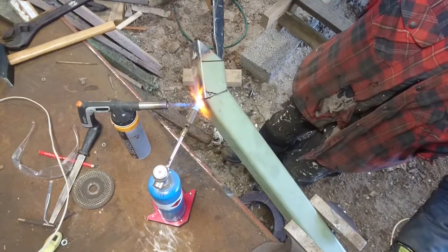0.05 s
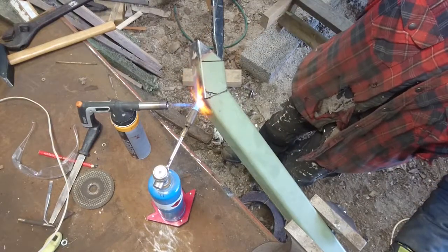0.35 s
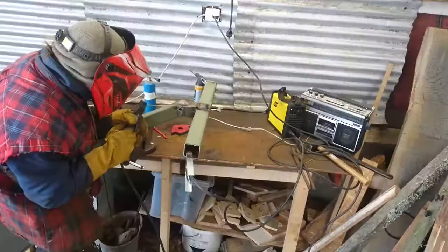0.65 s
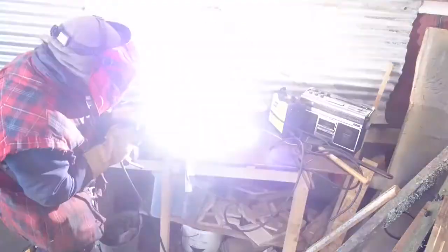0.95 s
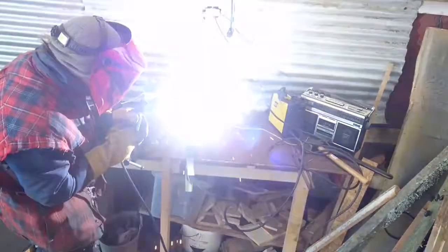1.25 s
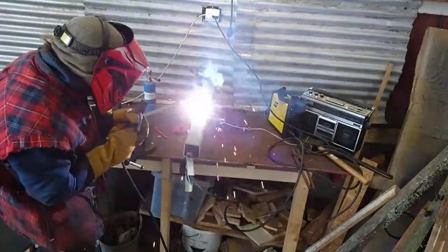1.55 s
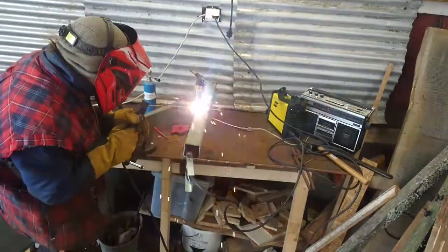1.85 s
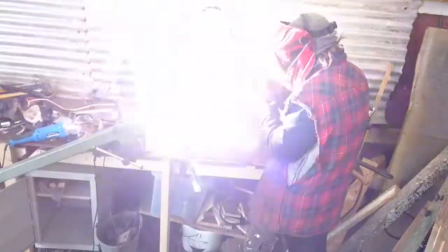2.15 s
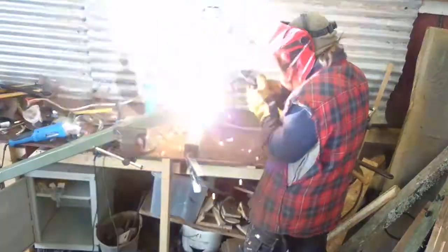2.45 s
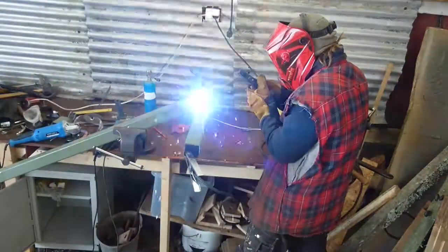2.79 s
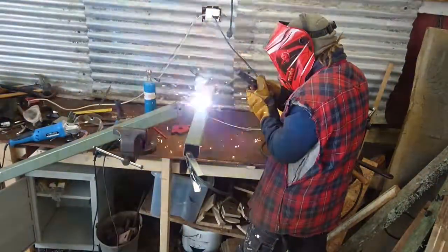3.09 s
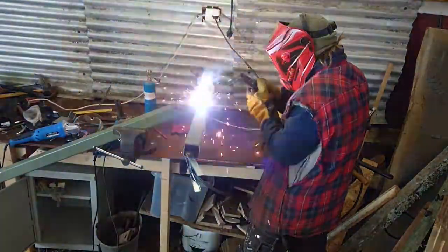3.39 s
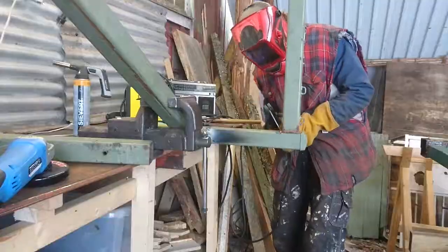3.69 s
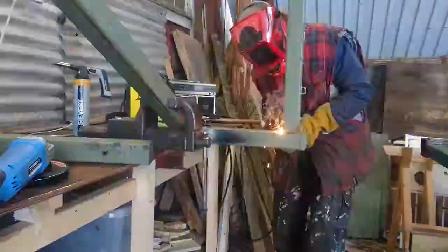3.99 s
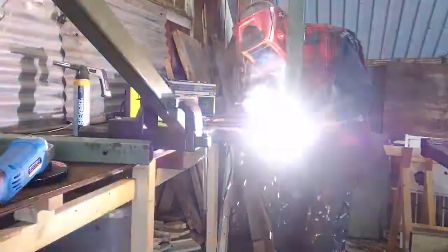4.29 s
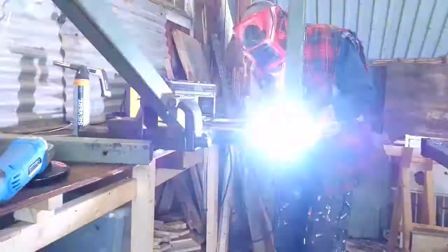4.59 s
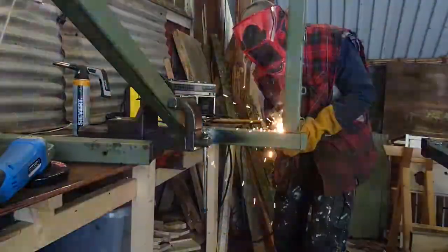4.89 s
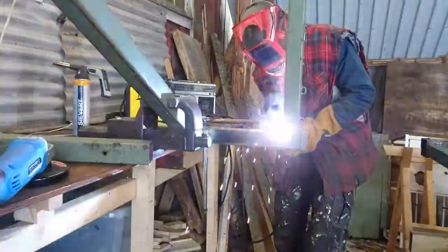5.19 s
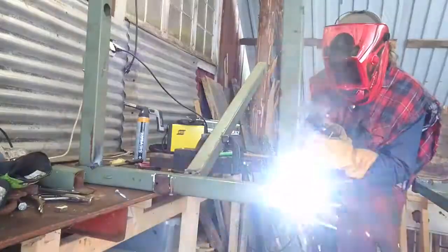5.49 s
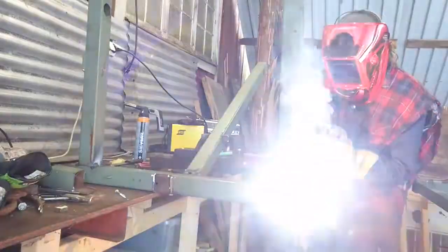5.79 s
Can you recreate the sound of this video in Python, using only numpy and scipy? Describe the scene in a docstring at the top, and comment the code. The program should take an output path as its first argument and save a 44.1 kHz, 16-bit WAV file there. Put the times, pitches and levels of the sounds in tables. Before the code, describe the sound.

A gas torch hisses and roars steadily against steel, close by, with a faint wavering whistle. After about half a second it cuts off abruptly, leaving a welding machine's faint whirring fan. An arc strikes with sharp snaps, then sizzles and sputters in several uneven runs, quieter than the torch, with brief pauses. It is heard from across a workbench, with quick echoes off the iron walls of a shed.

```python
"""Stick welding in a corrugated iron shed, cut in abruptly after a short blast of a gas torch.
The torch's jet roars, rings its burner tube and whistles against a steel tube. Then the arc burns in
several runs: tiny discharges sizzle, the molten pool sputters and bursting drops of metal spit.
It is heard from across the bench, then at the vice, with quick echoes off the iron walls,
while the welding machine's cooling fan whirs behind it."""
import sys
import numpy as np
from scipy import signal
from scipy.fft import rfft, irfft, next_fast_len
from scipy.io import wavfile
from scipy.ndimage import map_coordinates

SR = 44100
rng = np.random.default_rng(int(sys.argv[2]) if len(sys.argv) > 2 else 0)


def wav_out(sig):
    """Save sig, one row per channel (or a flat mono array), as 16-bit PCM at SR to the path in sys.argv[1]."""
    wavfile.write(sys.argv[1], SR, np.round(np.clip(np.atleast_2d(sig).T, -1, 1) * 32767).astype(np.int16))


N = 257522
TORCH_END_S, BENCH_STEP_S, VICE_S, VICE_STEP_S, END_S = .608, 2.03, 3.53, 5.42, 6  # listening places

# turns of the flame's whistling glide: time_s, pitch_hz, note_db, octave_db
WHISTLE_GLIDE = [(0.0, 849.6, -42.5, -53), (0.05, 757, -55.5, -38.5), (0.075, 580.4, -45, -40),
                 (0.1, 540.3, -63, -66), (0.125, 773.6, -60, -40), (0.148, 954, -40, -51),
                 (0.168, 886, -47, -54), (0.183, 953, -40.5, -53), (0.205, 746.0, -45, -35),
                 (0.222, 753, -43, -35.5), (0.24, 798.5, -48, -55), (0.265, 575.6, -62, -46),
                 (0.285, 559.7, -56, -50), (0.307, 604.5, -57, -41), (0.33, 648, -59, -52),
                 (0.35, 859, -45, -51), (0.378, 656.4, -43, -40), (0.398, 544.4, -64, -45),
                 (0.422, 536, -55, -44), (0.44, 582, -51, -47), (0.462, 768, -43, -38),
                 (0.482, 931, -45, -44), (0.5, 1090, -47, -54), (0.53, 995, -63, -59),
                 (0.552, 849, -51, -41), (0.568, 882.5, -31, -34), (0.587, 912, -57, -46),
                 (0.605, 937, -33.5, -35.5)]
# hollow ring of steelwork, bench and iron walls: pitch_hz, width_hz, lift_db
BENCH_RESONANCES = [(614, 75, 3), (822, 78, 6.5), (1122, 120, 7), (1365, 62, 3.5), (1473, 29, 10.5),
                    (1670, 68, 8.5), (2105, 60, 6.5), (2300, 50, 4.5), (2505, 64, 6.5), (2894, 67, 3.5),
                    (3220, 140, 3), (4540, 290, 3.5), (5320, 200, 5), (6200, 93, 5.5), (7020, 130, 4),
                    (7900, 110, 0), (9810, 71, 4), (11540, 130, 5), (12200, 200, 7), (13300, 160, 9.5),
                    (13900, 180, 4.5), (14850, 130, 3), (15220, 150, 4)]
# stereo balance across the bench and at the vice: freq_hz, left_over_right_db
BENCH_BALANCE = [(60, -20), (180, 3), (550, -3.5), (1650, -1), (4970, -0.5), (15000, -1)]
VICE_BALANCE = [(60, 2), (180, 1), (550, -3.5), (1650, -2), (4970, -2), (15000, -1.5)]
# drops of metal bursting in the arc: start_s, level_db
DROP_BURSTS = [(.9353, -39), (.9614, -39), (.9951, -31), (1.0309, -23), (1.043, -27), (1.068, -31),
               (1.121, -31), (1.134, -28), (1.1371, -25), (1.162, -32), (1.1929, -37), (1.1964, -36),
               (1.335, -37), (1.6421, -39), (1.7793, -54), (1.975, -41), (2.116, -37), (2.122, -31),
               (2.202, -40), (2.3857, -47), (2.404, -41), (2.437, -45), (2.4676, -43), (2.536, -31),
               (2.7414, -37.5), (2.9541, -38), (3.0975, -35), (3.1525, -38), (3.2172, -46), (3.311, -35),
               (3.5078, -33), (3.9494, -51), (3.967, -38), (3.9904, -43), (4.0448, -40), (4.0781, -45),
               (4.3079, -43), (4.3345, -46), (4.3578, -40), (4.4233, -44), (4.5419, -55), (4.6602, -36),
               (4.8262, -42), (4.9164, -36), (5.147, -32.5), (5.233, -35), (5.3158, -34.5), (5.3786, -38),
               (5.3945, -43), (5.435, -43), (5.452, -32), (5.5369, -43), (5.635, -47), (5.7173, -34)]


def amp(db):
    """Decibels to gain."""
    return 10 ** (np.asarray(db) / 20)


def unit(x):
    """Scale to rms 1."""
    return x / np.sqrt(np.mean(x ** 2) + 1e-20)


def along(points, hz):
    """Read (freq_hz, value) points on a log frequency axis."""
    freqs, values = np.transpose(points)
    return np.interp(np.log(hz + 1), np.log(freqs + 1), values)


def curves(rows):
    """One automation curve for each column after the time."""
    times, *columns = np.transpose(rows)
    return [np.interp(np.arange(N) / SR, times, column) for column in columns]


def during(start, end, fade_s=0.0017):
    """A gate with short ramps."""
    t = np.arange(N) / SR
    return np.clip(np.minimum(t - start, end - t) / fade_s + .5, 0, 1)


def swells(rows):
    """A sum of bell shapes: middle_s, width_s at half height, height."""
    t = np.arange(N) / SR
    return sum(height * .5 ** np.minimum((2 * (t - s) / width) ** 2, 20) for s, width, height in rows)


def dying(start, end, decay_s):
    """On at once, held to the end, then an exponential fall."""
    t = np.arange(N) / SR
    return (t >= start) * np.exp(-np.clip((t - end) / decay_s, 0, 20))


def wobble(rate):
    """A smooth random curve, rate knots a second."""
    return map_coordinates(rng.standard_normal(int(N * rate / SR) + 4), [np.arange(N) * rate / SR])


def noise():
    """Two unrelated noises: mid and side."""
    return rng.standard_normal((2, N))


def filtered(x, response):
    """Multiply the spectrum by a function of frequency."""
    size = next_fast_len(N + SR // 2)
    return irfft(rfft(x, size) * response(np.fft.rfftfreq(size, 1 / SR)), size)[..., :N]


def eq(x, curve):
    """Equalise by (freq_hz, gain_db) points."""
    return filtered(x, lambda hz: amp(along(curve, hz)))


def coloured(x, curve):
    """Equalise, then scale to rms 1."""
    return unit(eq(x, curve))


def bandpass(hz, pitch, width):
    """Response of one resonance, 1 at its pitch."""
    return 1j * hz * width / (pitch ** 2 - hz ** 2 + 1j * hz * width)


def resonating(x, modes):
    """Only the resonances (pitch_hz, width_hz, gain_db), in alternating polarity, at rms 1."""
    return unit(filtered(x, lambda hz: sum((-1) ** k * amp(db) * bandpass(hz, pitch, width)
                                           for k, (pitch, width, db) in enumerate(modes))))


def hollow(x, modes):
    """The sound with resonances (pitch_hz, width_hz, lift_db) ringing on top."""
    return filtered(x, lambda hz: 1 + sum((amp(db) - 1) * bandpass(hz, pitch, width)
                                          for pitch, width, db in modes))


def stereo(pair, width, balance):
    """Mid and side to left and right, with width and balance by frequency."""
    mid, side = pair[0], eq(pair[1], width)
    left_right = np.array([mid + side, mid - side])
    return filtered(left_right, lambda hz: amp(np.outer([.5, -.5], along(balance, hz))))


def burner_tube(waver_s=0.000174):
    """The burner tube rings; unsteady hot gas makes its resonances waver in pitch."""
    # tube resonances: pitch_hz, width_hz, gain_db
    modes = [(356, 66, -3.5), (442, 37, -1.5), (545, 24, -3.5), (1500, 57, -4.5), (2480, 55, -2),
             (2520, 35, -6), (3050, 32, -5), (3295, 31, -9), (3610, 120, -7), (3910, 90, -8.5),
             (4290, 150, -8), (4570, 140, -1.5), (4990, 42, -1), (5680, 110, -8.5), (6250, 99, -5),
             (6700, 170, -8), (7420, 70, -11.5), (8450, 350, -10), (10600, 160, -14), (12700, 2400, -17)]
    level = amp(-38 + 1.3 * wobble(42.2))
    ring = resonating(noise(), modes)
    warped_time = np.arange(N) + SR * waver_s * wobble(45)
    flutter = np.array([map_coordinates(channel, [warped_time], mode="mirror") for channel in ring])
    return eq(level * flutter, [(140, -29), (260, 0.5)])


def swirl(roar, depth=0.24):
    """The roar returns one whistle period later: a comb that glides with the note."""
    pitch_hz = curves(WHISTLE_GLIDE)[0]
    late = map_coordinates(roar, [np.arange(N) - SR / pitch_hz], order=1)
    return roar + depth * eq(late, [(350, -21), (550, 1.0), (2000, -24), (3200, -24)])


def whistle(jitter=0.0045, roughness=.54):
    """The flame sings against the steel: an unsteady note and its octave, fading in and out."""
    pitch_hz, *partials_db = curves(WHISTLE_GLIDE)
    phase = 2 * np.pi * np.cumsum(pitch_hz * (1 + jitter * wobble(250))) / SR
    return sum(amp(db) * unit((1 + roughness * wobble(139.7)) * np.sin(k * phase))
               for k, db in enumerate(partials_db, 1))


def low_thumps():
    """A brief low swell in the roar, then a short low thump just as the scene changes."""
    # low swell and thump: middle_s, length_s, level_db
    thumps = [(0.512, 0.039, -52.5), (0.603, 0.0058, -50)]
    # their dark colour: freq_hz, gain_db
    colour = [(40, -13), (100, -24), (150, -27), (200, 1), (260, -3.5), (400, -28), (1000, -60)]
    envelope = swells([(s, length, amp(db)) for s, length, db in thumps])
    return envelope * coloured(rng.standard_normal(N), colour)


def torch():
    """Turbulent gas hisses from the nozzle and rings the burner tube; the flame swirls and sings."""
    # colour of the gas jet: freq_hz, gain_db
    jet_colour = [(30, -27), (100, -42), (160, -43), (200, -19), (350, -9), (550, -2.5), (660, -19),
                  (780, -9), (1700, -1), (2700, -8.5), (4100, -10), (5300, -13.5), (9500, -13.5),
                  (15500, -20)]
    # flicker of the treble: time_s, gain_db
    treble_ride = [(.045, 1.5), (.06, 3), (.085, 4.5), (.1, -0.5), (.3, 1.5), (.45, -1), (.6, -2)]
    # stereo width: freq_hz, side_db
    width = [(60, -17), (150, -10), (380, -20.5), (950, -13), (2380, -9.5), (5980, -3), (15000, -1.5)]
    # stereo balance: freq_hz, left_over_right_db
    balance = [(60, 1), (150, 2), (380, 0.5), (950, -5.5), (2380, 0), (5980, -3), (15000, 0)]
    jet = amp(-36 + 0.32 * wobble(32) + 0.57 * wobble(200)) * coloured(noise(), jet_colour)
    flame = jet + burner_tube()
    treble = filtered(flame, lambda hz: np.clip((hz - 7000) / 3000, 0, 1))
    flame += (amp(curves(treble_ride)[0]) - 1) * treble
    flame[0] = swirl(flame[0]) + whistle() + low_thumps()
    return stereo(flame, width, balance) * during(-1, TORCH_END_S, fade_s=0.0014)


def fan_tones(lines, sway_db, waver=.003):
    """The fan's tones, each unsteady in level and pitch."""
    tones = np.zeros(N)
    for hz, db in lines:
        sway = amp(sway_db * wobble(18))
        phase = 2 * np.pi * np.cumsum(hz * (1 + waver * wobble(19))) / SR
        tones += amp(db) * unit(sway * np.sin(phase))
    return tones


def fan_at_bench():
    """Air rushes through the welder's vents; the motor hums and the case rings with it."""
    # colour of the rushing air: freq_hz, gain_db
    air_colour = [(30, -17), (100, -23), (165, -35), (200, -12), (255, -2), (300, -8), (500, -3.5),
                  (900, -2.5), (1400, 1), (1800, -5.5), (2100, -11), (4300, -7.5), (6000, -14.5),
                  (15500, -18)]
    # hum and whine: pitch_hz, level_db
    motor_tones = [(398.4, -69.5), (1782, -72.5)]
    # fader on the tones and the case ring: time_s, gain_db
    hum_ride = [(2.6, -0.5), (3.1, -5)]
    whir = amp(-63.5) * coloured(hollow(noise(), BENCH_RESONANCES), air_colour)
    whir += amp(-76) * resonating(noise(), [(1767, 40, 0)])
    hum_gain = amp(curves(hum_ride)[0])
    whir += hum_gain * amp(-79) * resonating(noise(), [(391.6, 14, 0)])  # the case
    whir[0] += hum_gain * fan_tones(motor_tones, sway_db=1.5)
    return whir


def fan_at_vice():
    """The fan from its other side: rushing air, a low drone and a whine that shifts with the place."""
    # colour of the rushing air: freq_hz, gain_db
    air_colour = [(30, -8), (100, -21), (160, -28), (220, -7.5), (550, -6), (850, 1), (1350, 1),
                  (1900, -2.5), (2300, -14), (3200, -11), (5000, -20.5), (15500, -20)]
    # fan tones at the first and second place: pitch_hz, level_db
    first_tones = [(258.4, -82), (1335, -70)]
    second_tones = [(1297, -68.5), (1776, -69)]
    # low, wavering drone: start_s, end_s, pitch_hz, width_hz, level_db
    drones = [(3.53, 3.948, 254, 18, -86), (3.948, 5.42, 260, 15, -76.5), (5.42, 5.9, 235, 36, -73.5)]
    first, second = during(VICE_S, VICE_STEP_S), during(VICE_STEP_S, END_S)
    whir = amp(-65) * coloured(noise(), air_colour)
    whine_level = amp(-60.5 + wobble(50))
    whir += first * whine_level * resonating(noise(), [(1207, 48, -3), (1350, 73, 2), (1600, 234, -6)])
    whir += second * amp(-67.5) * resonating(noise(), [(1223, 38, 1), (1600, 130, -12)])
    whir[0] += first * fan_tones(first_tones, sway_db=1) + second * fan_tones(second_tones, sway_db=3)
    for start, end, hz, width, db in drones:
        band = [(hz + k * width, gain) for k, gain in [(-3, -120), (-1, -6), (0, 0), (1, -6), (3, -120)]]
        whir[0] += amp(db) * during(start, end) * coloured(rng.standard_normal(N), band)
    return whir


def fan():
    """The welder's cooling fan whirs with a different colour from each side."""
    # stereo width: freq_hz, side_db
    width = [(60, -32), (180, -2.5), (550, -11), (1650, -9), (4970, -2.5), (15000, 0)]
    bench = stereo(fan_at_bench(), width, BENCH_BALANCE) * during(TORCH_END_S, VICE_S)
    vice = stereo(fan_at_vice(), width, VICE_BALANCE) * during(VICE_S, END_S)
    return bench + vice


def spits(fragments=8, spatter_db=-3, mean_delay_s=.0045):
    """A bursting drop gives one sharp snap, then a quick spatter of smaller ones."""
    # bright colour of a snap: freq_hz, gain_db
    colour = [(150, -38), (500, -12), (4000, -1), (15000, 10.5)]
    snaps = np.zeros(N)
    for start, db in DROP_BURSTS:
        snaps[round(start * SR)] += amp(db)
        delay = rng.exponential(mean_delay_s, fragments)
        size = amp(db + spatter_db) * np.exp(-.5 * delay / mean_delay_s) * rng.choice([-1, 1], fragments)
        landing = np.minimum((start + delay) * SR, N - 1).astype(int)
        snaps += np.bincount(landing, size, N)
    return eq(snaps, colour)


def arc_envelopes(break_s=0.012, flare_db=-24, flare_s=0.0038):
    """Sizzle and sputter levels: each run holds, surges and chokes; a bursting drop flares the sizzle."""
    # runs from strike to break: start_s, end_s, sizzle_db, sputter_db
    runs = [(0.938, 0.964, -50, -53.5), (0.993, 1.17, -48.5, -54), (1.19, 1.423, -50, -54.5),
            (1.442, 2.011, -54, -57), (2.108, 3.511, -54, -60), (3.948, 4.014, -61.5, -60.5),
            (4.027, 4.419, -54.5, -55.5), (4.54, 5.407, -58, -60.5), (5.426, 5.9, -55.5, -57.5)]
    # the rod melts off faster: middle_s, length_s, sizzle_change_db, sputter_change_db
    surges = [(1.042, 0.016, 5.5, -2), (1.07, 0.029, 7, 5), (1.121, 0.046, 3, 8), (1.29, 0.034, 4.5, -2),
              (1.341, 0.047, 6.5, 6.5), (1.408, 0.047, 4.5, 3), (1.581, 0.038, 1, 7.5),
              (1.663, 0.05, 8.5, 6), (1.987, 0.069, 3.5, 5.5), (2.131, 0.048, 15, 16.5),
              (2.226, .06, 8.5, 11), (2.348, 0.073, 3, 4), (2.527, 0.056, 7.5, 7), (2.678, 0.084, 6.5, 1.5),
              (2.765, .03, 4, -5), (2.88, .03, 5, -4), (2.928, 0.035, 5, 5), (2.975, 0.035, 0.5, 1),
              (3.05, 0.046, 8.5, 4), (3.097, 0.03, 11.5, 9), (3.26, 0.042, 3.5, -11),
              (3.352, 0.038, 6, -1.5), (3.465, 0.075, 7.5, 4), (4.153, 0.028, -1, 4), (4.203, 0.017, -2, 5),
              (4.37, 0.021, 7.5, -2), (4.414, .03, -1, 2), (4.668, 0.031, 7.5, -1), (4.774, 0.03, 6.5, 0),
              (4.853, 0.094, 11, 3), (5.192, 0.17, 8, 1), (5.46, 0.022, 8.5, 4), (5.724, 0.042, 7, 8.5)]
    # the rod dips into the pool: middle_s, length_s, drop_db
    chokes = [(1.186, .012, 4), (1.351, .01, 11), (1.478, 0.043, 8), (1.882, 0.079, 6), (2.822, 0.069, 12),
              (3.196, 0.048, 15), (3.389, .024, 6), (4.03, .039, 8.5), (4.551, 0.046, 9),
              (5.022, 0.12, 4.5), (5.574, 0.049, 7), (5.79, 0.047, 3)]
    surge_db = swells([(s, length, db) for s, length, db, _ in surges])
    boil_db = swells([(s, length, db) for s, length, _, db in surges])
    hand_db = 0.76 * wobble(23) - swells(chokes)  # an unsteady hand, and the dips
    sizzle, sputter = sum(np.outer(amp(levels_db), dying(start, end, break_s))
                          for start, end, *levels_db in runs)
    flares = sum(amp(db + flare_db) * dying(s, s, flare_s) for s, db in DROP_BURSTS)
    return np.hypot(sizzle * amp(surge_db + hand_db), flares), sputter * amp(boil_db + hand_db)


def sparks(spread_db, per_second=4500):
    """Tiny discharges at random moments, many small and a few large."""
    size = amp(spread_db * np.minimum(rng.standard_normal(N), 2.5))
    return unit((rng.random(N) < per_second / SR) * size * rng.choice([-1, 1], N))


def arc(envelopes, sizzle_colour, sputter_colour, modes):
    """A stream of discharges: fine sizzle on top, the molten pool sputtering below."""
    sizzle_level, sputter_level = envelopes
    flicker = amp(wobble(55) + 1.2 * wobble(220))  # the arc length never holds still
    fine, coarse = hollow(np.array([sparks(spread_db=4), sparks(spread_db=4.5)]), modes)
    sizzle = sizzle_level * coloured(fine, sizzle_colour)
    sputter = amp(-1) * sputter_level * coloured(coarse, sputter_colour)
    return flicker * (sizzle + sputter)


def shed(x, tail_db=-4.5, early_db=-6, early_t60_s=0.022):
    """Direct sound, quick echoes off bench and iron walls, and a short tail: mid and side."""
    # decay of the tail: freq_hz, t60_s
    decay = [(200, 0.097), (2000, 0.31), (8000, 0.1), (15000, 0.24)]
    hz, t, spectrum = signal.stft(rng.standard_normal((2, SR // 4)), SR, nperseg=256)
    tail = signal.istft(spectrum * amp(-60 * t / along(decay, hz)[:, None]), SR, nperseg=256)[1]
    t = np.arange(tail.shape[1]) / SR
    early = rng.standard_normal(tail.shape) * amp(-60 * t / early_t60_s)
    echoes = amp(tail_db) * tail / np.linalg.norm(tail[0])
    echoes += amp(early_db) * early / np.linalg.norm(early[0])
    impulse = np.pad(echoes, ((0, 0), (SR // 500, 0)))  # the nearest surface answers 2 ms late
    impulse[0, 0] = 1  # direct sound, in the mid only
    impulse /= np.linalg.norm(impulse, axis=1, keepdims=True)
    return signal.fftconvolve(x[None], impulse, axes=1)


def drifting_echoes(x, start, end, stretch_s=.16):
    """As rod and welder move, each short stretch of the arc meets slightly different echoes."""
    heard, size = np.zeros((2, N + SR)), round(stretch_s * SR)
    for i in range(round(start * SR), min(round(end * SR), N), size):
        stretch = shed(x[i:i + size])
        heard[:, i:i + stretch.shape[1]] += stretch
    return heard[:, :N]


def puffs(decay_s=0.022):
    """Hot gas blown out of the pool gives a short, dull puff with no deep bass."""
    # puffs from the weld: start_s, level_db
    blows = [(2.12, -54), (5.665, -61)]
    # their dull colour: freq_hz, gain_db
    colour = [(80, -60), (130, -26), (180, -2), (280, -6), (390, 7), (520, -5), (830, 5), (1600, -15),
              (4000, -43)]
    envelope = sum(amp(db) * dying(s, s, decay_s) for s, db in blows)
    return eq(envelope * coloured(rng.standard_normal(N), colour), [(80, -22), (180, 1.5)])


def welding():
    """Arc, spits and puffs in the shed, coloured one way across the bench and another at the vice."""
    # colour of the arc's fine sizzle: freq_hz, gain_db
    bench_sizzle = [(1500, -33), (3500, -7.5), (6000, -2.5), (8000, -1), (10000, 1), (13000, -2.5),
                    (15500, 1.5)]
    vice_sizzle = [(1500, -39), (3500, -9.5), (6000, -5), (8000, -3.5), (10000, -3.5), (12000, -3),
                   (15500, 0.5)]
    # colour of the sputtering pool: freq_hz, gain_db
    bench_sputter = [(100, -55), (160, -45), (200, -4), (300, -6), (430, 7.5), (520, -4), (800, 3),
                     (1700, 1), (2200, -2), (3000, 1.5), (4500, 3.5), (6500, -4), (10000, -2.5)]
    vice_sputter = [(100, -46), (160, -26), (210, 0), (430, -4.5), (800, 3), (1700, 5), (2200, -0.5),
                    (3700, -2.5), (5200, 1.5), (7000, -4.5), (10000, -3)]
    # hollow ring of the steelwork and walls at the vice: pitch_hz, width_hz, lift_db
    vice_resonances = [(370, 70, 5.6), (600, 43, 4.8), (1990, 52, 4), (2870, 100, 5), (3140, 70, 4.5),
                       (3570, 110, 5.2), (4230, 200, 2.6), (7130, 200, 3.1), (7920, 220, 4.7),
                       (9500, 140, 2.2), (10950, 200, 4), (12050, 230, 2.6)]
    # stereo width: freq_hz, side_db
    width = [(60, -27), (150, -22), (380, -12), (950, -16), (2380, -16), (5980, -3), (15000, -2.5)]
    bursts = spits() + puffs()
    envelopes = arc_envelopes()
    bench = arc(envelopes, bench_sizzle, bench_sputter, BENCH_RESONANCES) + bursts
    vice = arc(envelopes, vice_sizzle, vice_sputter, vice_resonances) + bursts
    places = [(TORCH_END_S, BENCH_STEP_S, bench, BENCH_BALANCE),
              (BENCH_STEP_S, VICE_S, bench, BENCH_BALANCE),
              (VICE_S, VICE_STEP_S, vice, VICE_BALANCE),
              (VICE_STEP_S, END_S, vice, VICE_BALANCE)]
    return sum(during(start, end) * stereo(drifting_echoes(sound, start, end), width, balance)
               for start, end, sound, balance in places)


def scene():
    """Torch first, then the arc over the fan."""
    return torch() + welding() + fan()


def record(dry, top_hz=15950, dc_offset=-.0009):
    """Cut the highest treble and add a tiny constant offset."""
    return filtered(dry, lambda hz: hz < top_hz) + dc_offset


dry = scene()
out = record(dry)
wav_out(out)
```